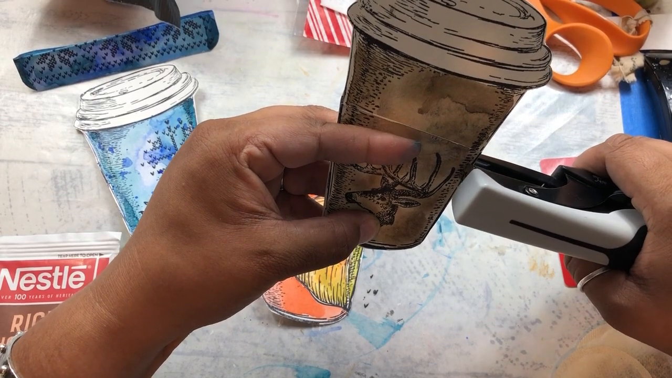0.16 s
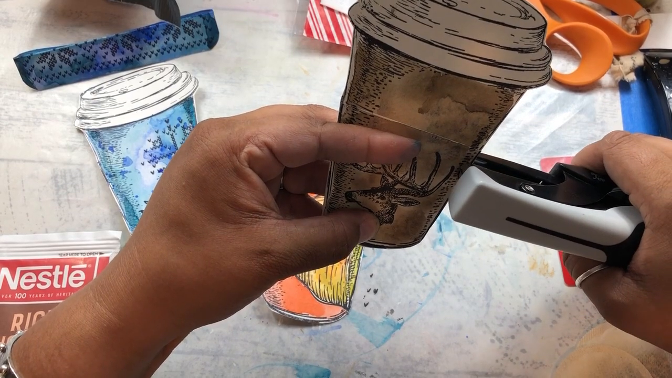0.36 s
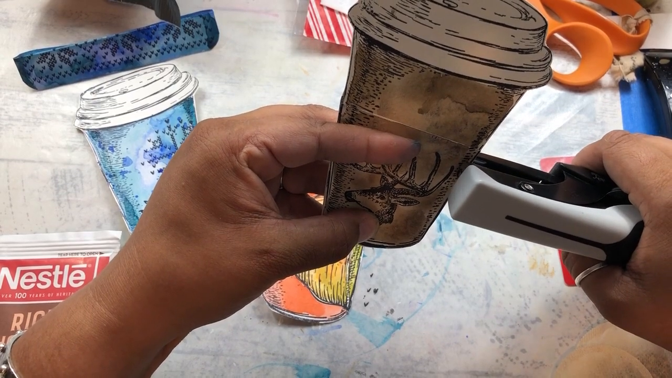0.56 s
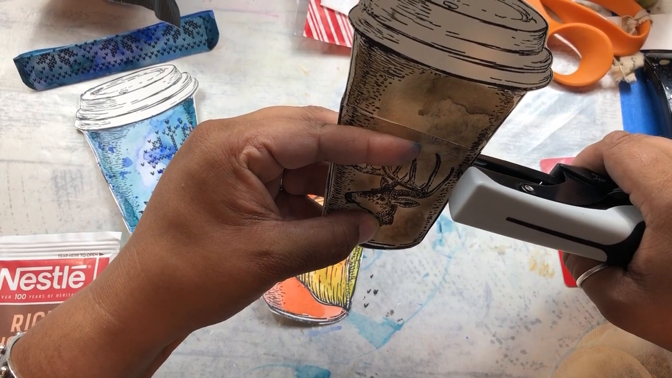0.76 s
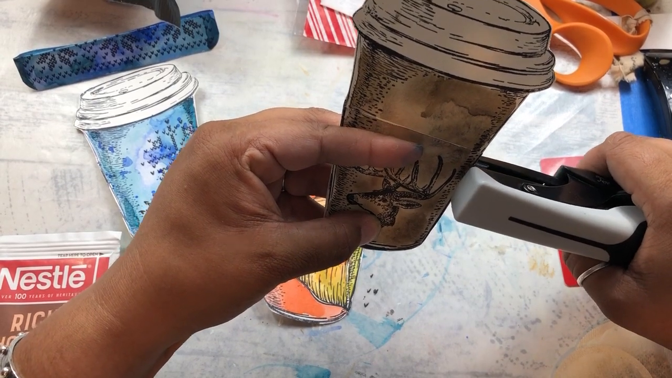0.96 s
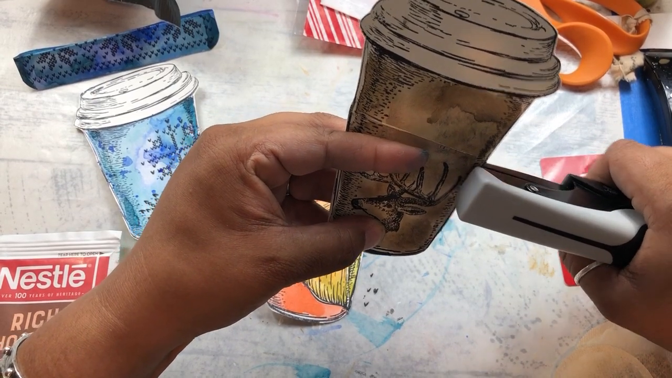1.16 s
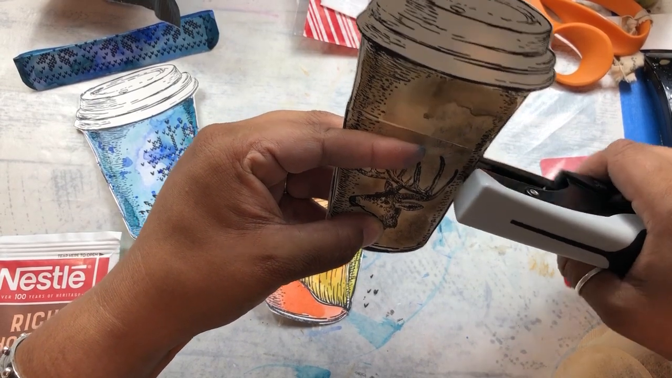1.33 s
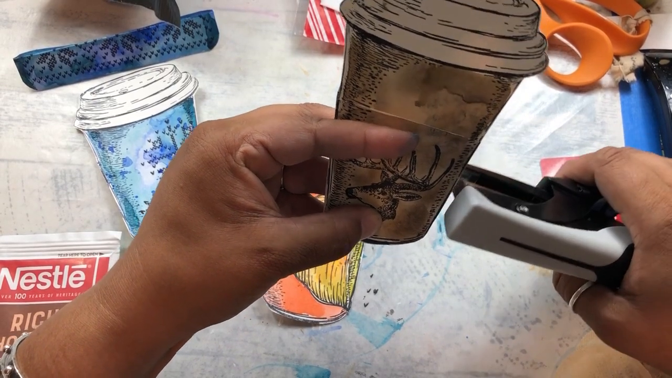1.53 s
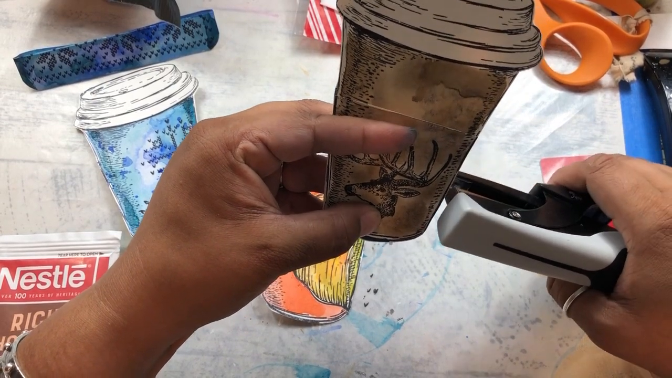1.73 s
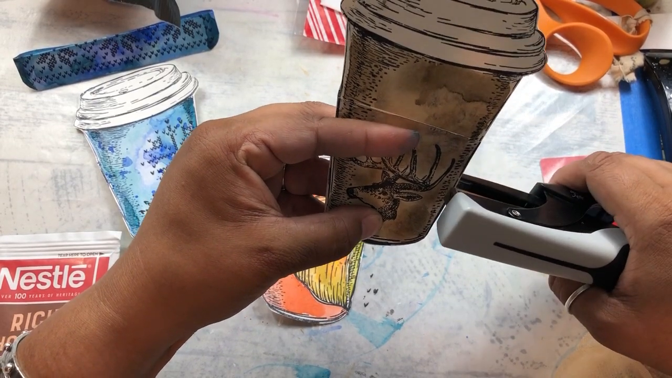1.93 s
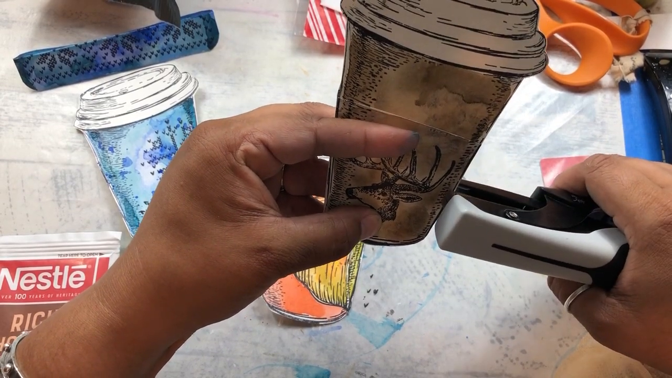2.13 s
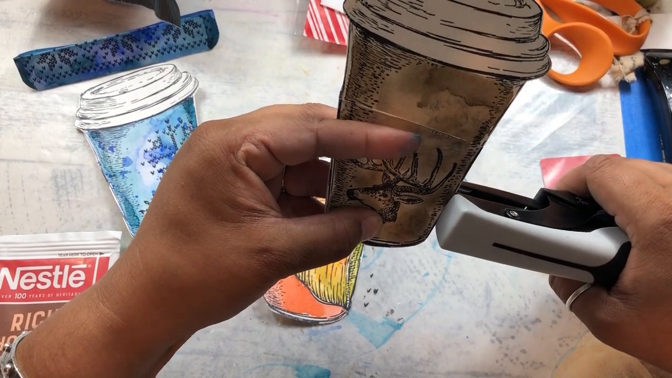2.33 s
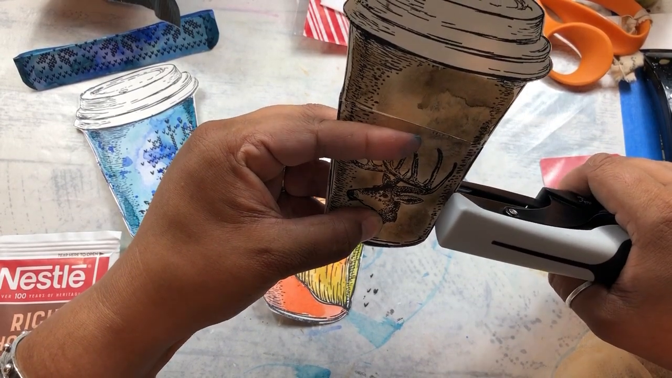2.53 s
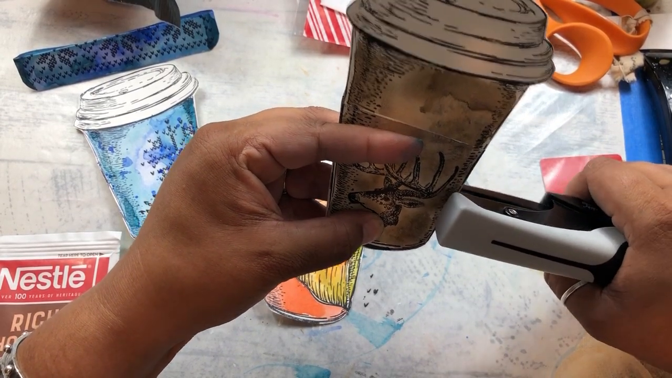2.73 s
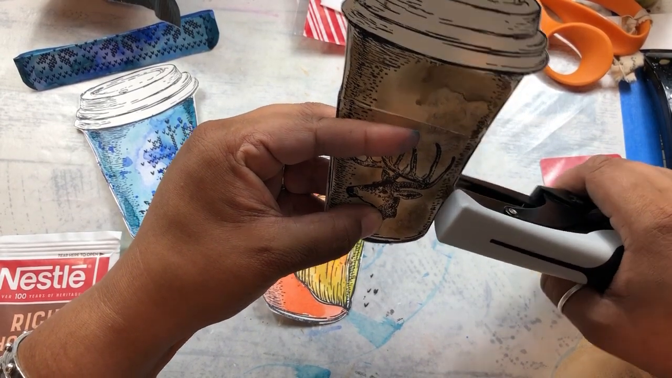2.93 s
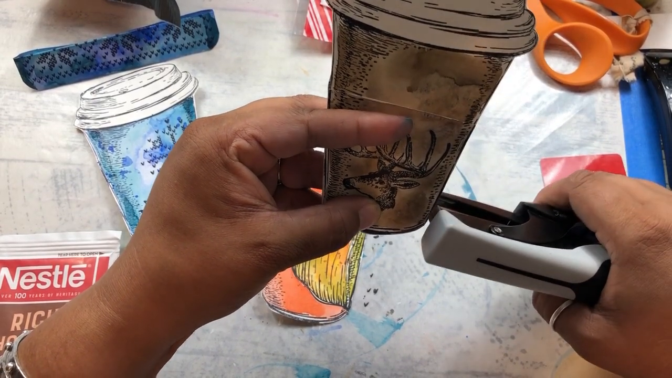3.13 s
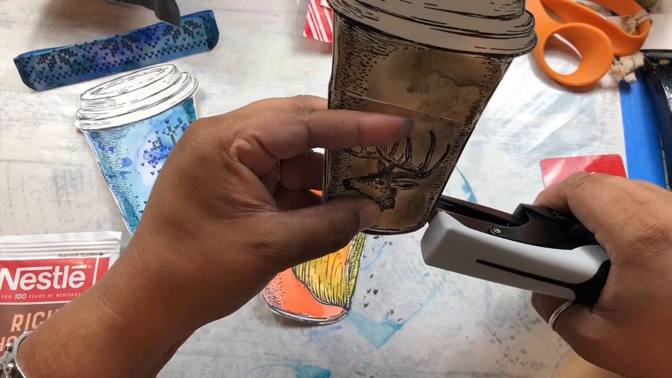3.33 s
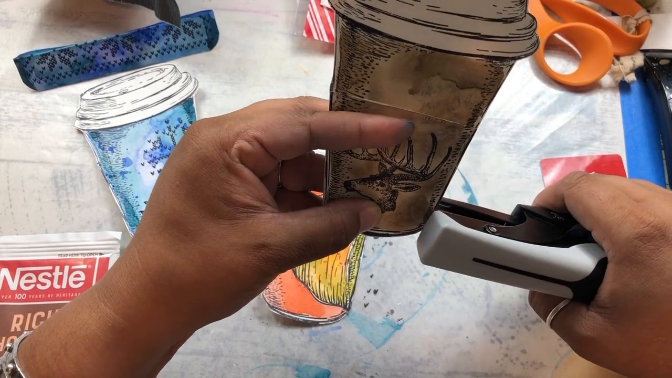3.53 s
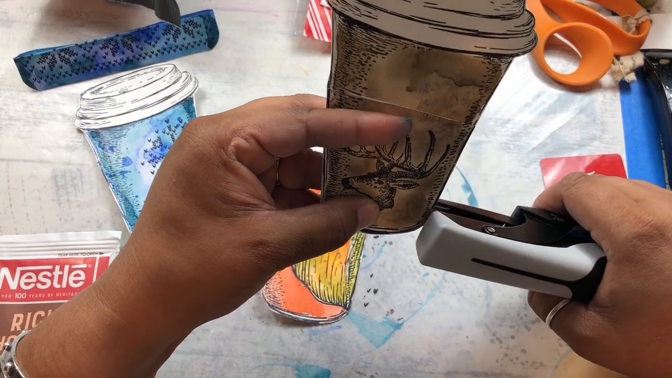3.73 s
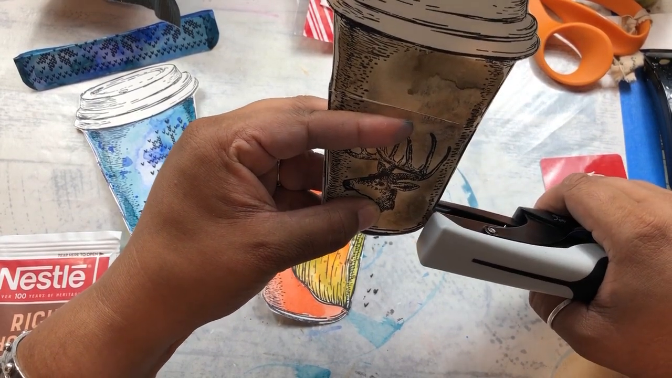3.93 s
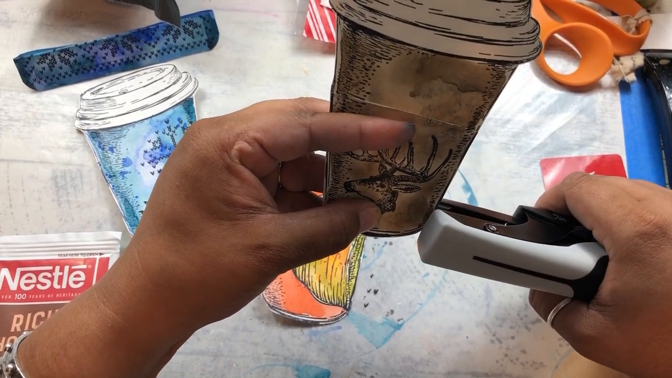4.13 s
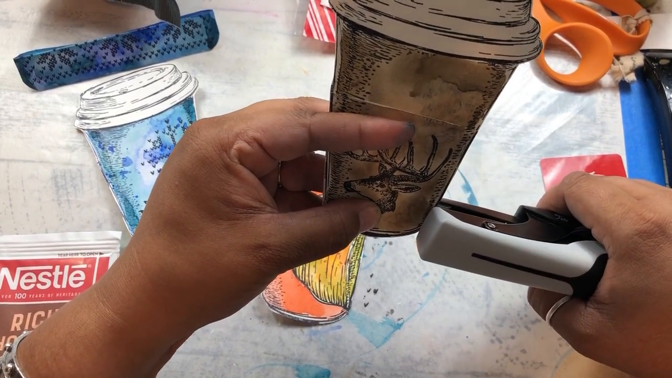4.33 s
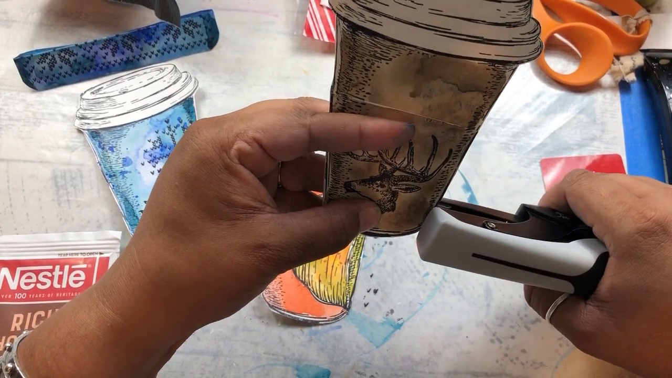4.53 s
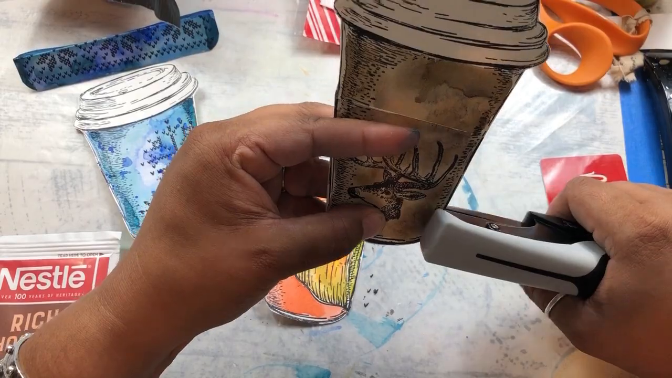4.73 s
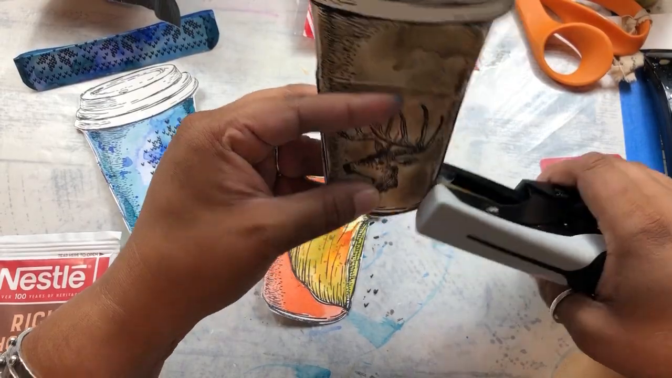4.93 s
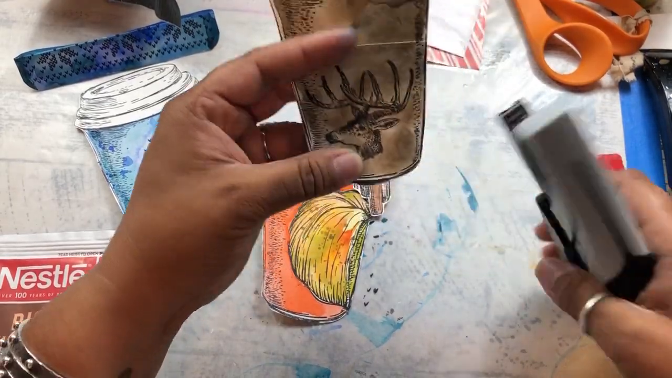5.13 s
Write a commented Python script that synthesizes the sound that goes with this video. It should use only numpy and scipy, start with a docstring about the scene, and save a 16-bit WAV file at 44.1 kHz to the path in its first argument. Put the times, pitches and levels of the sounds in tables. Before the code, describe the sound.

Three spaced, crisp stapler presses at close range, each with a hollow knock and spring-back snap, then a brief rustle of card and fingers.

```python
"""A small hand stapler is pressed three times through card, close to a microphone, in a quiet room.
Room hiss, rumble and a machine's wavering tones run throughout; light ticks of card and fingers, damped
noise snaps, begin at once. Each press shears a staple and clinches it (the first in two steps): noise rings
steel modes, a hollow knock and a thump swell. Then it unlatches, the spring rubs, snaps back and shivers.
Card and fingers slide after each press, mostly after the last, as clumped noise. Near echoes and a short
tail follow each sound."""
import sys
import numpy as np
from scipy import signal
from scipy.fft import rfft, irfft
from scipy.io import wavfile

SR = 44100
rng = np.random.default_rng(int(sys.argv[2]) if len(sys.argv) > 2 else 0)


def generate_wav(signal):
    """Clip the signal to [-1, 1] and save it as 16-bit WAV at the path in sys.argv[1]."""
    frames = np.transpose(np.atleast_2d(signal))
    scaled = np.clip(frames, -1, 1) * 32767
    pcm = np.round(scaled).astype(np.int16)
    wavfile.write(sys.argv[1], SR, pcm)


N = 228075

# Stapler blows. Each row: start in seconds, stage, metal crack in dB, ring of the steel against the crack
# in dB, hollow knock before its high-pass in dB, knock delay in seconds, knock frequency in Hz.
BLOWS = [(1.0637, "shear", -17, -10, -11.5, .0029, 1814), (1.097, "clinch", -34, -5, -20, 0.00062, 1690),
         (1.1905, "clinch", -20.5, -7, -2.5, .0024, 1787), (1.3200, "unlatch", -41, -9.5, -45, .001, 1830),
         (1.3510, "snap back", -21.5, -10, -22.5, 0.00062, 1750),
         (2.7354, "shear", -17, -5.5, -3, .0037, 1750), (2.7684, "clinch", -21, -7, -2, .0018, 1750),
         (2.8980, "unlatch", -41.5, -13, -43, 0.0008, 1800),
         (2.9290, "snap back", -21, -10, -21.5, .0007, 1810), (4.6642, "shear", -16, -14, -22, .002, 1750),
         (4.7070, "clinch", -19.5, -10, -2, .0023, 1837), (4.8243, "unlatch", -45, -9, -50, 0.00069, 1796),
         (4.8539, "snap back", -23.5, -13, -25.5, .0007, 1910)]


def amp(db):
    """Decibels to gain."""
    return 10 ** (np.asarray(db) / 20)


def evened(x):
    """Scales to rms 1."""
    return x / np.sqrt(np.mean(x ** 2) + 1e-20)


def read(points, hz):
    """Reads a table along log frequency."""
    f, value = np.transpose(points)
    return np.interp(np.log(hz + 1), np.log(f + 1), value)


def add(mix, start_s, sound):
    """Mixes a sound in at a time."""
    part = mix[round(start_s * SR):][:len(sound)]
    part += sound[:len(part)]


def coloured(x, spectrum):
    """Gives a signal the spectrum of a table."""
    gain = amp(read(spectrum, np.fft.rfftfreq(len(x), 1 / SR)))
    return irfft(rfft(x) * gain, len(x))


def high(x, hz, order):
    """High-pass."""
    return signal.sosfilt(signal.butter(order, hz, "high", fs=SR, output="sos"), x)


def swelling_ring(t, hz, width_hz):
    """A damped resonance driven by a soft blow: swells, then dies; envelope peak 1."""
    u = np.pi * width_hz * np.maximum(t, 0)
    return u * np.exp(1 - u) * np.sin(2 * np.pi * hz * t)


def background():
    """Steady room hiss and rumble, and the wavering tones of a distant machine."""
    # Each row: frequency in Hz, relative density in dB per Hz.
    air = [(30, -23), (55, -3), (110, -7.5), (200, -6), (240, 0), (280, -6.5), (400, -11), (700, -17),
           (1300, -25), (1700, -25), (2500, -31.5), (5000, -36), (9000, -38.5), (15800, -44)]
    # Each row: frequency in Hz, width of the wavering in Hz, level in dB.
    hum = [(59.2, 1.5, -68), (221.5, 2.5, -61), (238, 10., -63), (296.1, .3, -64), (333.8, 2.5, -76),
           (8700, 40., -98)]
    air_db = -61
    t = np.arange(N) / SR
    out = amp(air_db) * evened(coloured(rng.standard_normal(N), air))
    for hz, width_hz, db in hum:
        r = np.exp(-np.pi * width_hz / SR)
        noise = rng.standard_normal(N) + 1j * rng.standard_normal(N)
        wobble = signal.lfilter([1], [1, -r], noise)
        carrier = 2.0 + wobble / np.sqrt(np.mean(abs(wobble) ** 2))  # a steady tone plus its wavering
        tone = (carrier * np.exp(2j * np.pi * hz * t)).real
        out += amp(db) * evened(tone)
    return out


def tick(chance, db, hz, snap_db):
    """A short dry snap of card or fingers: decaying noise with one broad peak."""
    t60_s = 0.025
    t = np.arange(len(chance)) / SR
    snap = high(chance, 450., order=2) * amp(-60 * t / t60_s)
    sound = signal.lfilter(*signal.iirpeak(hz, 2.5, SR), snap) + amp(snap_db) * snap
    return amp(db) * sound / np.sqrt(np.mean(sound[:100] ** 2))


def room(direct, all_round):
    """A few near echoes, and sparse taps of random sign dying band by band."""
    # Desk and walls nearby. Each row: delay in seconds, level in dB.
    echoes = [(.0055, -18), (0.0104, -21), (.0135, -28), (.021, -29)]
    # Room tail. Each row: frequency in Hz, t60 in seconds, relative level in dB.
    tail_bands = [(149, 0.9, -1.5), (500, 0.25, -2), (1640, 0.23, -0.5), (2950, 0.25, 0), (4940, 0.17, -1),
                  (8000, .2, -3), (15000, 0.13, 8.5)]
    tail_db = -10
    taps = np.zeros(SR // 2)
    at = np.arange(200, len(taps) - 20, 20)
    taps[at + rng.integers(0, 20, len(at))] = rng.choice([-1., 1.], len(at))
    hz, t, z = signal.stft(taps, SR, nperseg=256)
    t60_s, db = (read([(row[0], row[k]) for row in tail_bands], hz)[:, None] for k in (1, 2))
    tail = signal.istft(z * amp(db - 60 * t / t60_s), SR, nperseg=256)[1]
    tail *= amp(tail_db) / np.linalg.norm(tail)
    out = direct + signal.fftconvolve(all_round, tail)[:N]
    for delay_s, echo_db in echoes:
        add(out, delay_s, amp(echo_db) * direct)
    return out


def blow(chance, stage, crack_db, ring_db, knock_db, delay_s, knock_hz):
    """A crack rings the steel, the hollow body knocks, the hand thumps: to the microphone and all round."""
    # Shared by the blows of one stage. Each entry: rise in seconds, crack t60 in seconds, thump in dB,
    # struck part from 0 (driver blade) to 1 (spring and magazine).
    stages = {"shear": (0.0024, 0.0176, -34, 0.11), "clinch": (.003, 0.0256, -34, 0.13),
              "unlatch": (0.0023, 0.0058, -62.5, 1), "snap back": (0.0012, 0.0087, -52.5, 1)}
    # Clatter of small loose parts. Each row: frequency in Hz, relative density from the blade in dB per Hz,
    # the same from the spring in dB per Hz.
    clatter_spectra = [(300, -31, -44.5), (1221, -11.5, -27.5), (2550, 0.5, -6.5), (3900, 1.5, 1.5),
                       (5078, 1.5, 0), (6000, -4.5, 1.5), (7300, -3, 1), (9200, -8.5, -6),
                       (10500, -9.5, -2), (13393, -8.5, -5.5), (15600, -10, -11), (15800, -6.5, -5)]
    # Stapler modes, most damped by the hand. Each row: frequency in Hz, relative level from the blade in dB,
    # the same from the spring in dB, t60 in seconds.
    steel_modes = [(739.5, -8.5, -32, 0.015), (1048, -2, -30.5, 0.01), (1660, -12.5, -19.5, .06),
                   (1810, -9, -33, 0.032), (2216, -12, -14.5, 0.016), (2404, -7.5, -10.5, 0.014),
                   (2756, -31, -35, 0.21), (3440, -27, -22, .06), (3840, -8, -6, .005),
                   (4200, 2.5, -12.5, 0.0041), (5890, -27.5, -16.5, 0.025), (6470, -18, -9.5, 0.014),
                   (8510, -19, -4, 0.019)]
    spike_db, spike_t60_s, rattle_db, rattle_t60_s = 3, 0.007, -23, 0.07
    knock_width_hz, knock_edge_hz, thump_hz = 330, 1500, 284

    rise_s, t60_s, thump_db, part = stages[stage]
    t = np.arange(len(chance)) / SR
    rise = np.minimum(t / rise_s, 1) ** 2
    fall_s = np.maximum(t - rise_s, 0)
    burst = rise * amp(-60 * fall_s / t60_s)
    spike = rise * amp(spike_db - 60 * fall_s / spike_t60_s)  # the first full contact is the hardest
    rattle = rise * amp(rattle_db - 60 * fall_s / rattle_t60_s)  # loose staples keep shaking
    colour = [(f, a + part * (b - a)) for f, a, b in clatter_spectra]
    clatter = (burst + spike + rattle) * evened(coloured(chance, colour))

    hz, blade_db, spring_db, ring_t60_s = np.transpose(steel_modes)[:, :, None]
    mode_db = blade_db + part * (spring_db - blade_db)
    modes = amp(mode_db - 60 * t / ring_t60_s) * np.sin(2 * np.pi * hz * t)
    steel = signal.fftconvolve(burst * chance, modes.sum(0))[:len(t)]
    steel = high(steel, 570.0, order=3)  # the steel rings without bass
    steel *= amp(ring_db) / np.sqrt(np.mean(steel[:400] ** 2))

    knock = high(swelling_ring(t - delay_s, knock_hz, knock_width_hz), knock_edge_hz, order=4)
    knock *= amp(knock_db)
    thump = swelling_ring(t - .004, thump_hz, 130.0)
    thump += 0.32 * swelling_ring(t - .008, 165., 50.)
    thump += 1.1 * swelling_ring(t - .004, 390., 150.0)
    thump += .1 * swelling_ring(t - .015, 100., 34.0)  # the desk answers late
    body = amp(crack_db) * steel + amp(thump_db) * thump

    # summed over all directions the clatter has its smooth mean colour
    even = coloured(signal.unit_impulse(len(t), idx=100), colour) * (t < .02)
    even *= np.linalg.norm(clatter) / np.linalg.norm(even)
    # the hollow faces the microphone: the walls get less knock, and also a higher, broader side mode
    side_mode = amp(knock_db - 11.0) * swelling_ring(t - delay_s, 2200., 700.)
    direct = body + knock + amp(crack_db) * clatter
    all_round = body + amp(-7.5) * knock + side_mode + amp(crack_db) * even
    return direct, all_round


def spring():
    """The coiled spring rubs in its guide from unlatching to snap back, then shivers out: resonant noise."""
    # Fuzzy resonances. Each row: frequency in Hz, width in Hz, relative level while it slides in dB,
    # the same after it snaps back in dB.
    resonances = [(1750, 400, -3, -5.5), (3450, 250, -16, 0), (4600, 500, -0.5, -20), (5707, 500, -7, -1),
                  (8410, 600, -16, -13)]
    rub_db, shiver_start_db, t60_s = -50, -43.5, 0.22
    t, slide, shiver = np.arange(N) / SR, np.zeros(N), np.zeros(N)
    starts, ends = ([row[0] for row in BLOWS if row[1] == stage] for stage in ("unlatch", "snap back"))
    for start, end in zip(starts, ends):
        slide += amp(rub_db) * (t > start) * (t < end)
        shiver += amp(shiver_start_db - 60 * np.maximum(t - end, 0) / t60_s) * (t >= end)
    out, noise = np.zeros(N), rng.standard_normal(N)
    for hz, width_hz, slide_db, shiver_db in resonances:
        fuzz = evened(signal.lfilter(*signal.iirpeak(hz, hz / width_hz, SR), noise))
        out += fuzz * (amp(slide_db) * slide + amp(shiver_db) * shiver)
    return out


def slides():
    """Card and fingers sliding: clumped grains of friction, as a scrape coloured by card and a fine hiss."""
    # Each row: start in seconds, length in seconds, scrape in dB, fine hiss in dB.
    strokes = [(1.515, 0.027, -60, -68), (3.045, 0.07, -60, -70.5), (4.947, 0.086, -62, -63),
               (5.031, 0.062, -68.5, -78), (5.086, 0.089, -62.5, -66.5)]
    # Scrape colour. Each row: frequency in Hz, relative density in dB per Hz.
    rustle_spectrum = [(300, -34.5), (1200, -7.5), (1900, 6), (2400, -1.5), (3300, -9), (4800, -8),
                       (7000, -17), (15800, -33)]
    # Hiss colour. Each row: frequency in Hz, relative density in dB per Hz.
    hiss_spectrum = [(2000, -29), (6000, -2.5), (9000, 1), (15800, -5)]
    fade_s, clump = 0.006, 96  # clump length in samples
    clump_db = 3.0 * np.minimum(rng.exponential(1, N // clump + 1), 4)
    grains = rng.standard_normal((2, N)) * amp(np.repeat(clump_db, clump)[:N])
    t = np.arange(N) / SR
    scrape, hiss = np.zeros(N), np.zeros(N)
    for start, length, scrape_db, hiss_db in strokes:
        envelope = np.clip(np.minimum(t - start, start + length - t) / fade_s, 0, 1)
        scrape += amp(scrape_db) * envelope
        hiss += amp(hiss_db) * envelope
    scrape *= evened(coloured(grains[0], rustle_spectrum))
    hiss *= evened(coloured(grains[1], hiss_spectrum))
    return scrape + hiss


def scene():
    """Stapler, ticks and slides in the room, over the background."""
    # Light ticks of card and fingers. Each row: start in seconds, level in dB, centre in Hz,
    # broad snap against its centre in dB.
    ticks = [(.025, -53, 1120, -48), (.41, -67.5, 2500, -17), (.910, -49, 1660, -20),
             (1.027, -68, 3000, -5), (1.038, -62, 1820, -7), (1.170, -57, 1700, -18),
             (1.518, -61, 1750, -27), (1.534, -62, 2440, -22), (1.881, -63, 2010, -15),
             (1.926, -50.5, 1600, -35.5), (2.714, -57.5, 1674, -21.5), (3.11, -51.5, 2210, -37.5),
             (3.187, -55.5, 2120, -22.5), (3.682, -61.5, 1686, -25), (4.171, -63.5, 2010, -24),
             (4.22, -67, 2986, -18), (4.31, -63.5, 1747, -35), (4.35, -62.5, 1703, -34.5),
             (4.39, -62, 1805, -34.5), (4.641, -65, 3500, -15.5), (4.654, -64, 3080, -30.5),
             (4.971, -48, 1290, -10), (4.981, -46, 1560, -26), (4.985, -47.5, 2520, -19.5),
             (5.100, -50.5, 1830, -18), (5.108, -48, 1800, -29.5), (5.144, -50, 2600, -15)]
    direct = slides() + spring()
    for (start_s, *row), chance in zip(ticks, rng.standard_normal((len(ticks), 2048))):
        add(direct, start_s, tick(chance, *row))
    all_round = direct.copy()
    for (start_s, *row), chance in zip(BLOWS, rng.standard_normal((len(BLOWS), 8192))):
        to_microphone, to_walls = blow(chance, *row)
        add(direct, start_s, to_microphone)
        add(all_round, start_s, to_walls)
    return (room(direct, all_round) + background())[None]


def record(dry):
    """The microphone's bass cut and the band limit of the recorder."""
    bass_cut_hz, edge_hz = 49, 16000
    thin = high(dry, bass_cut_hz, order=2)
    low_pass = signal.firwin(511, edge_hz, window=("kaiser", 9), fs=SR)
    return signal.oaconvolve(thin, low_pass[None], "same")


dry = scene()
out = record(dry)
generate_wav(out)
```